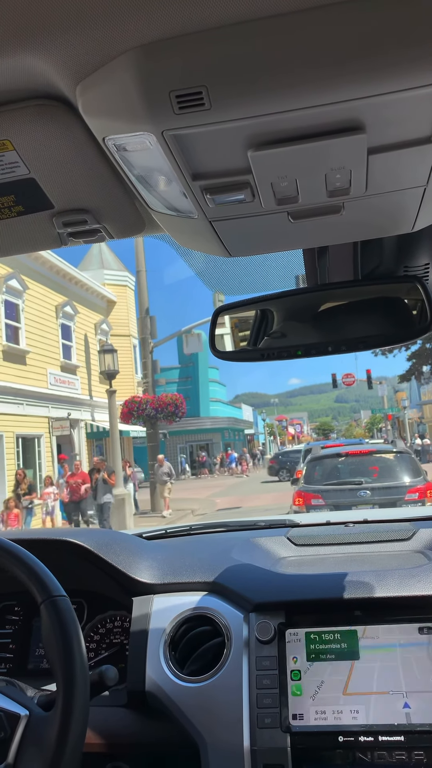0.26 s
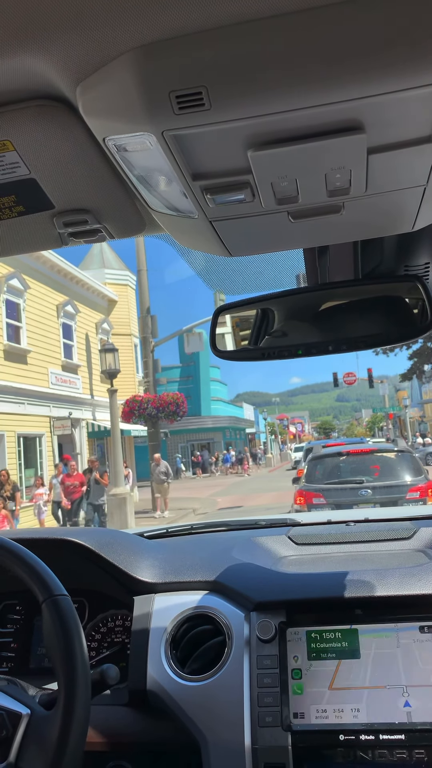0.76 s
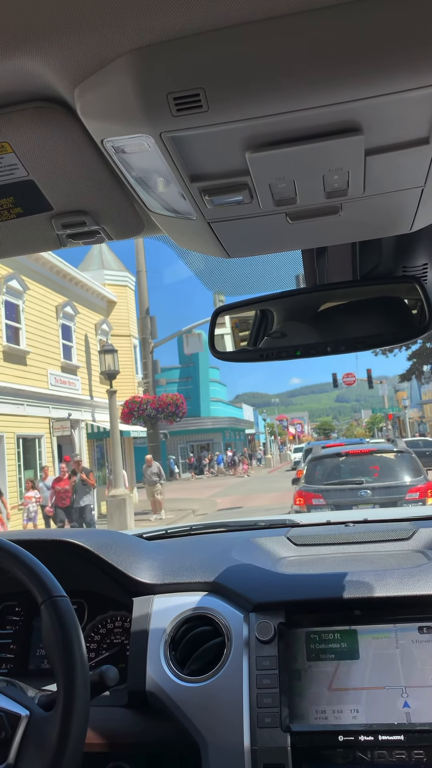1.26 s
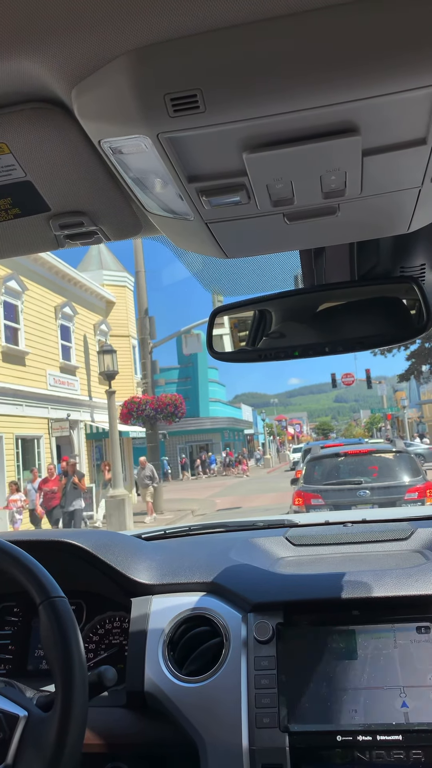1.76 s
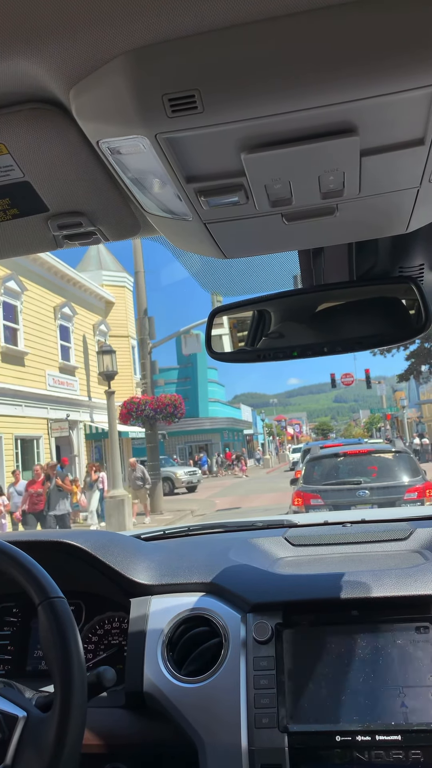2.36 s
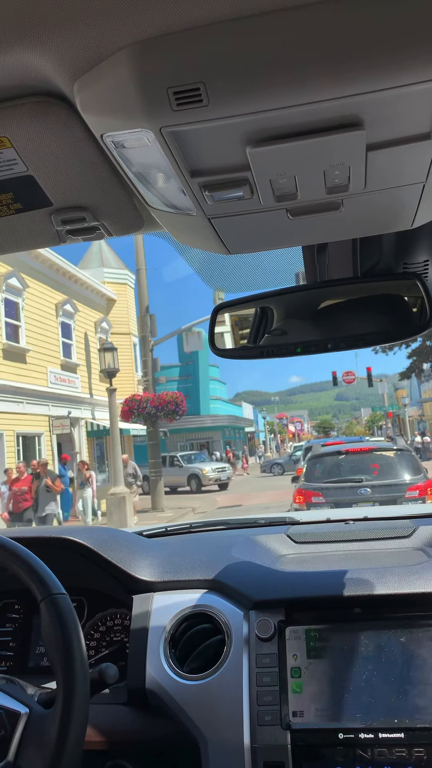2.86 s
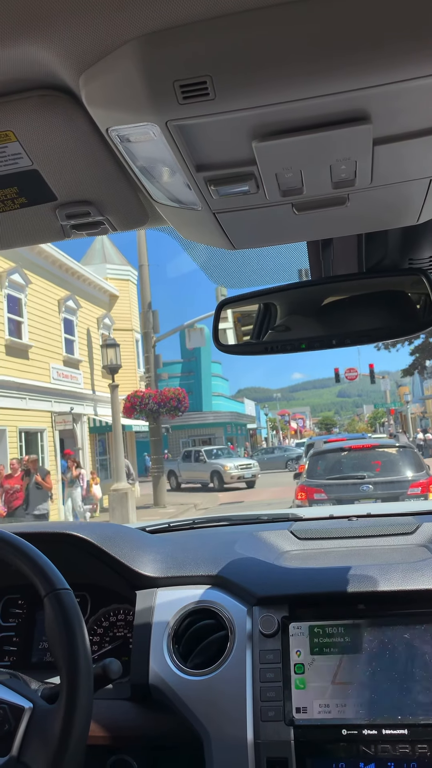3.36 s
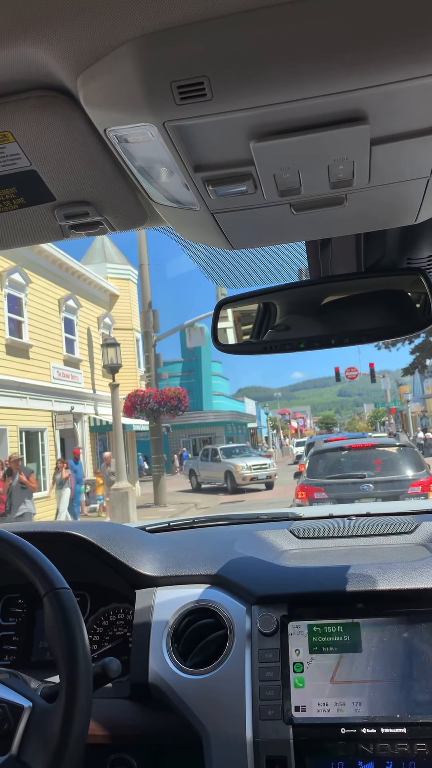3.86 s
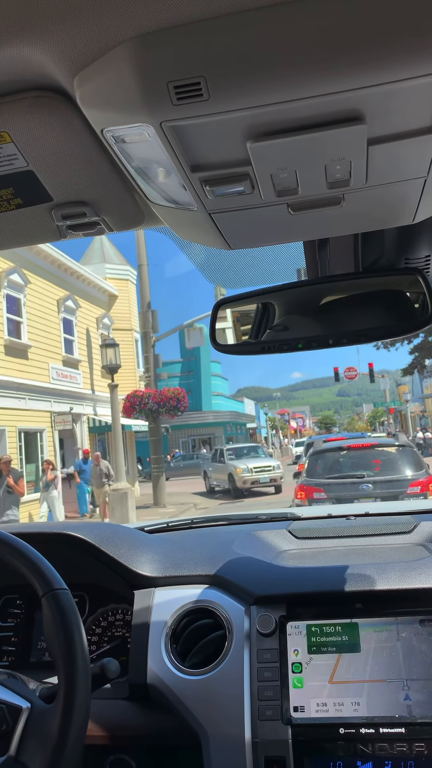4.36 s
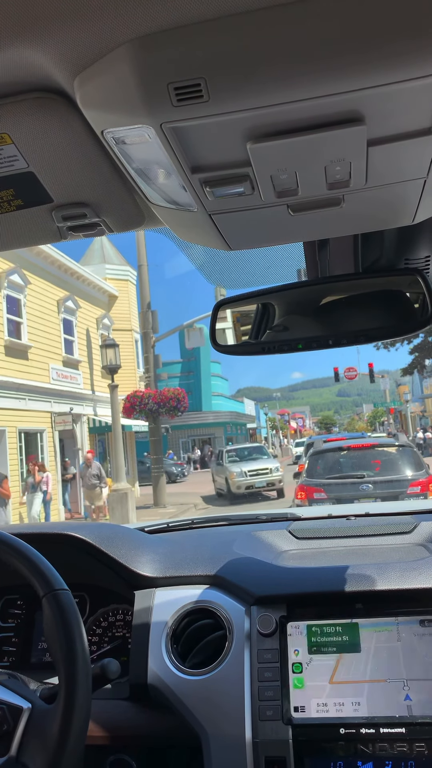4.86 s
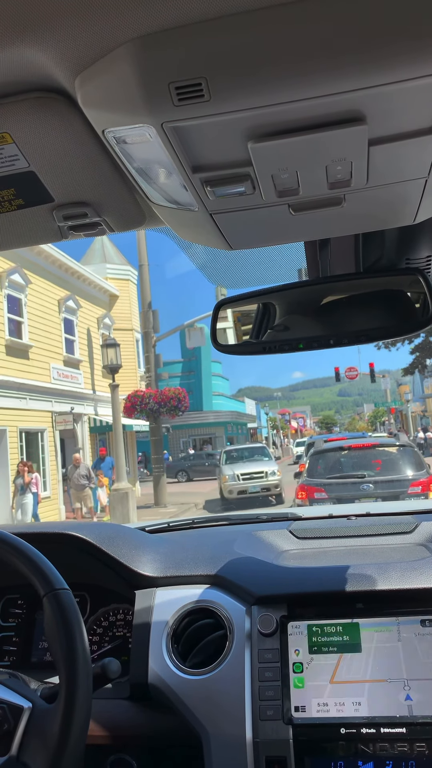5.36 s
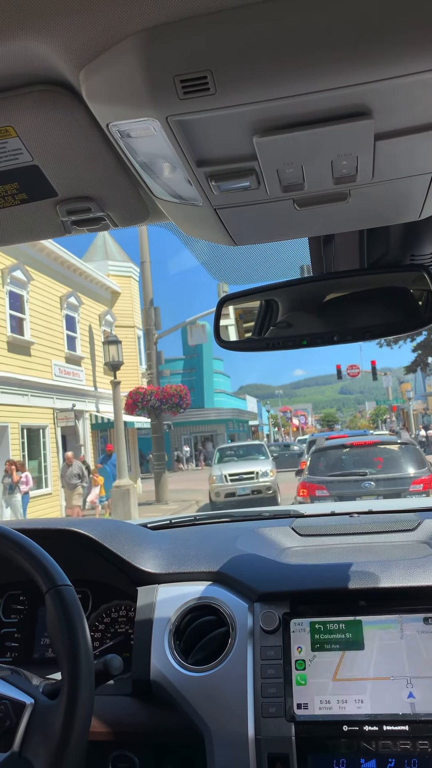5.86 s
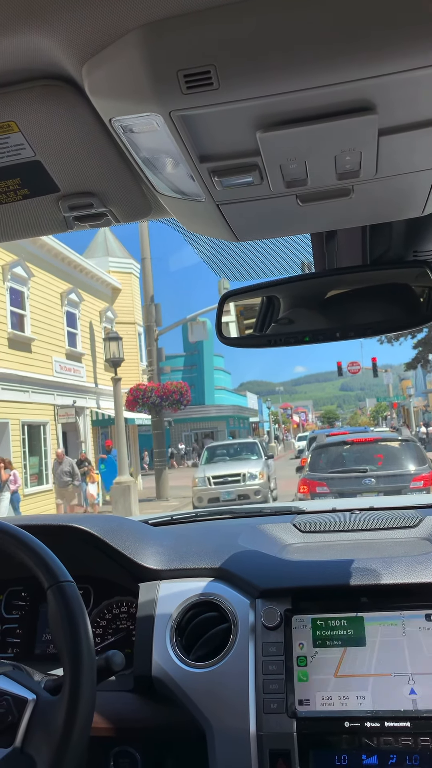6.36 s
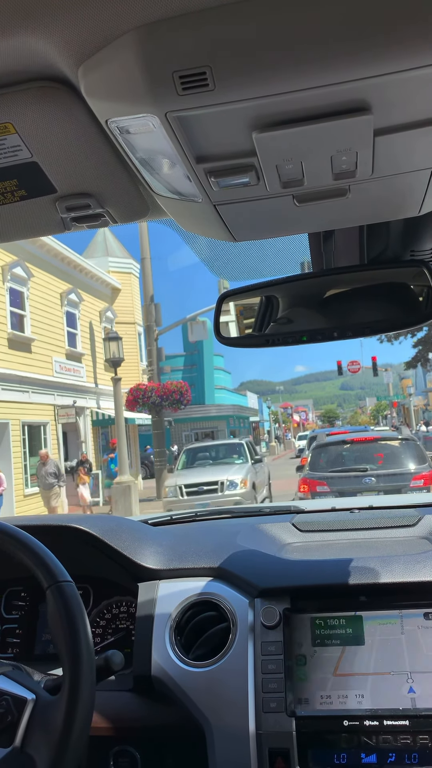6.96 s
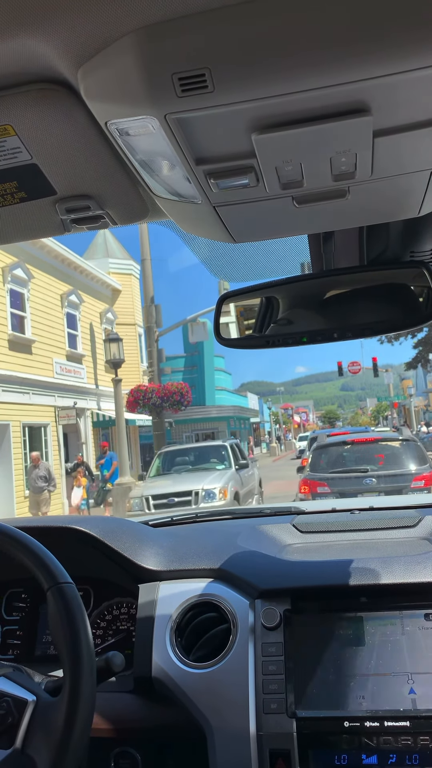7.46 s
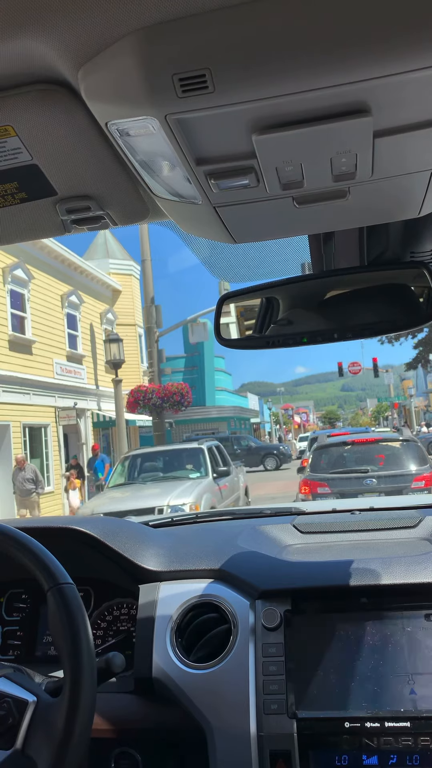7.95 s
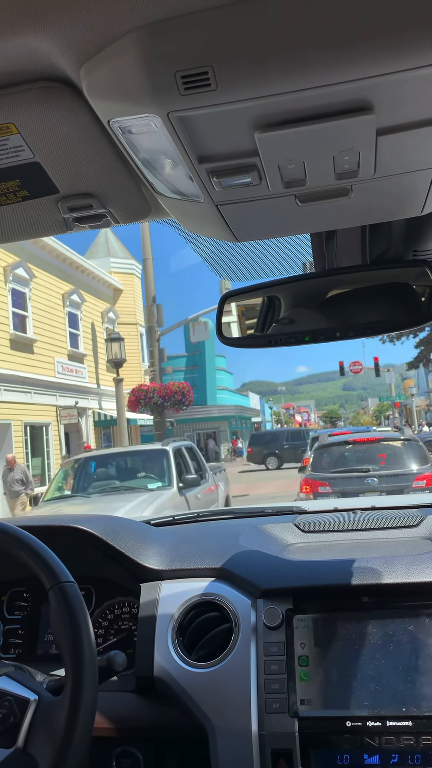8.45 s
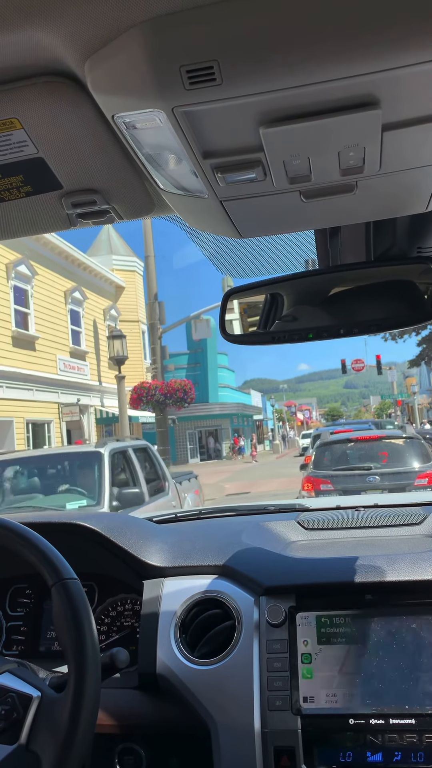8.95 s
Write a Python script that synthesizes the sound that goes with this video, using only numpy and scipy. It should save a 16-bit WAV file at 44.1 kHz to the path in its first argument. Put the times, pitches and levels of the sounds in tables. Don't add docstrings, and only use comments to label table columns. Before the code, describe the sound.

Strong ventilation rush fills a slow-moving car, with regular turn-signal clicking and a deep engine hum that eases down after several seconds.

```python
import sys
import numpy as np
from scipy import signal
from scipy.fft import rfft, irfft, next_fast_len
from scipy.io import wavfile
from scipy.ndimage import uniform_filter1d, map_coordinates

SR = 44100
rng = np.random.default_rng(int(sys.argv[2]) if len(sys.argv) > 2 else 0)


def wav_record(signal):
    frames = np.transpose(np.atleast_2d(signal))
    bounded = np.clip(frames, -1, 1)
    quanta = np.round(bounded * 32767).astype(np.int16)
    wavfile.write(sys.argv[1], SR, quanta)


def gain_from_db(level_db):
    decades = np.asarray(level_db, float) / 20
    return 10 ** decades


N = 406161

# frequency in Hz, density in dB per Hz.
BOOM_SPECTRUM = [(20, -28), (48, -8), (64, -5.5), (82, -4), (99, -4.5), (116, 1), (153, -5), (192, -3),
                 (236, -8), (278, -8), (385, -20), (441, -16.5), (528, -37), (1000, -92)]
# frequency in Hz, lead of the right in radians.
BOOM_LEAD = [(50, .25), (100, 0.32), (200, 0.21), (300, 0.69), (450, 0.89)]
# frequency in Hz, likeness from 0 to 1.
BOOM_ALIKE = [(30, 1), (200, 1), (300, 0.95), (500, 0.94)]
# centre in Hz, width in Hz, level in dB.
CENTRE_DUCTS = [(590, 42, -3.5), (720, 40, -5.5), (824.5, 120, -1), (1044, 99, -7.5), (1140, 78, -0.5),
                (1260, 94, -11), (1524, 180, -10.5), (1581.6, 53, -2), (1930, 93, -13), (2161, 237, -9.5),
                (2420, 78, -12), (2670, 130, -17), (3903, 160, -15.5), (4110, 100, -13.5),
                (6005, 140, -21.5)]
# centre in Hz, width in Hz, level in dB.
SIDE_DUCTS = [(687, 106, 1.5), (880, 87, -2), (1840, 110, -1.5), (2010, 80, -8), (2245, 87, -14),
              (2390, 63, -8), (3150, 150, -9), (3290, 81, -6), (3710, 90, -14), (3980, 120, -15),
              (4320, 99, -11), (4890, 160, -15), (5340, 220, -22)]
# frequency in Hz, density in dB per Hz.
JET_SPECTRUM = [(200, -38), (400, 0), (650, -0.5), (950, -6), (1350, -6), (1750, -11), (2400, -9.5),
                (3500, -14), (5000, -15), (5800, -17.5), (7500, -23), (8800, -27), (9800, -52),
                (12000, -90)]
# frequency in Hz, likeness from 0 to 1.
JET_ALIKE = [(400, 0.45), (1000, 0.27), (2500, 0.3), (3500, 0.067), (5000, 0.52), (7000, 0.53)]
# frequency in Hz, lead of the right in radians.
JET_LEAD = [(400, 0.8), (700, 0), (1350, 0.6), (1900, 1), (2500, 2), (3000, 4), (3600, 6.5), (4200, 7),
            (5000, 9), (6000, 8.5), (7000, 4.5)]
# frequency in Hz, left minus right in dB.
JET_PAN = [(300, 5.5), (650, -5), (950, -3.5), (1350, -0.5), (2500, 1), (5500, -2.5), (10000, -2.5)]
# frequency in Hz, density in dB per Hz.
EDGE_SPECTRUM = [(5400, -40), (7000, -7.5), (8500, 1.5), (10200, 0), (12000, 1.5), (13200, -2.5),
                 (14200, -5), (14800, -5), (15500, -15), (17000, -24)]
# frequency in Hz, level in dB.
EDGE_OWN = [(7000, 0), (8500, -5), (9500, -8), (10200, -15), (12000, -20), (15000, -15)]
# time in seconds, firing rate in Hz, load in dB.
ENGINE_COURSE = [
    (0, 43.9, 0),
    (2.6, 43.8, .7),
    (4.1, 43.3, 1),
    (4.6, 42, -5),
    (5.3, 40.2, -2.5),
    (6, 38, -4.5),
    (6.8, 37.5, -11),
    (9.21, 37.5, -11),
]
# frequency in Hz, level in dB, decay by 60 dB in seconds,
# lead of the right in radians.
TICK_MODES = [(2390, -4, .035, .7), (2570, -1, .035, 1.6), (2660, -3, .03, 1.8), (2740, -1, .035, 2),
              (2830, -2, .03, 2.2), (2950, -5, .03, 1), (3085, -1.5, .04, .7), (3200, -7, .025, 1.4),
              (3320, -8, .02, 1.8)]
# frequency in Hz, level in dB, decay by 60 dB in seconds,
# lead of the right in radians.
TOCK_MODES = [(2300, -5, .025, 1), (2410, -2, .03, .6), (2570, 0, .03, 1.5), (2690, -3, .03, 1.8),
              (2820, -1, .03, 1.9), (2950, -3, .025, .8), (3100, -7, .025, 1.2)]
FIRST_STROKES_S = [
    .1485,
    .4985,
]
# delay after the stroke in seconds, level in dB.
BOUNCES = [
    (0, 0),
    (.006, -2),
    (.012, -4),
]
# start in seconds, level in dB, frequency in Hz, left minus right in dB.
CREAKS = [
    (3.739, -51, 8250, -4.5),
    (4.272, -62, 13500, 0),
    (4.826, -52, 8490, -3.5),
]


def along(points, hz):
    point_hz, values = np.transpose(points)
    return np.interp(np.log(hz + 1), np.log(point_hz + 1), values)


def curves(rows):
    s, *columns = np.transpose(rows)
    return [np.interp(np.arange(N) / SR, s, column) for column in columns]


def unit(x):
    return x / np.sqrt(np.mean(x ** 2) + 1e-20)


def wobble(rate):
    knots = rng.standard_normal(int(N * rate / SR) + 4)
    return map_coordinates(knots, [np.arange(N) * rate / SR])


def filtered(x, response):
    m = next_fast_len(N + 8192)
    return irfft(rfft(x, m) * response(np.fft.rfftfreq(m, 1 / SR)), m)[..., :N]


def blower():
    boom = ports(eddies(patchy_db=0.79), lambda hz: gain_from_db(along(BOOM_SPECTRUM, hz)), BOOM_ALIKE, BOOM_LEAD,
                 pan=[(60, 2.0), (250, 0.0), (450, -2.0)])
    centre = ports(eddies(patchy_db=1.0), pipes(CENTRE_DUCTS),
                   alike=[(600, 0.89), (1500, 1.0), (4000, 0.62)],
                   lead=[(800, -0.89), (1140, -0.0093), (2200, 0.49), (4100, 0.47)],
                   pan=[(800, 0.0), (1600, -3.0), (2200, -1.0), (4100, -1.5)])
    sides = ports(eddies(patchy_db=5.5), pipes(SIDE_DUCTS),
                  alike=[(600, 0.87), (5000, 0.77)],
                  lead=[(700, -2.5), (1200, -4.0), (2200, -4.0), (5000, -3.0)],
                  pan=[(700, -9.0), (2200, 3.5), (5000, -5.5)])
    jets = ports(eddies(patchy_db=1.25), lambda hz: gain_from_db(along(JET_SPECTRUM, hz)),
                 JET_ALIKE, JET_LEAD, JET_PAN)
    ducts = gain_from_db(-51) * centre + gain_from_db(-58.5) * sides
    hiss = gain_from_db(-49.5) * jets + gain_from_db(-64) * louvres()
    flutter_db = 0.11 * wobble(9)
    return gain_from_db(-33) * boom + gain_from_db(flutter_db) * (ducts + hiss)


def eddies(patchy_db):
    z = signal.stft(rng.standard_normal((2, N)), nperseg=512)[2]
    field = rng.standard_normal(z.shape[1:])
    field = uniform_filter1d(field, size=5, axis=0)
    field = uniform_filter1d(field, size=10, axis=1)
    return signal.istft(z * gain_from_db(patchy_db * unit(field)), nperseg=512)[1][:, :N]


def ports(pair, colour, alike, lead, pan):
    def mixing(hz):
        angle = np.arccos(np.clip(along(alike, hz), -1, 1)) / 2
        return colour(hz) * [np.cos(angle), np.sin(angle)]

    def skew(hz):
        left = gain_from_db(along(pan, hz) / 2) * np.exp(-.5j * along(lead, hz))
        return [left, 1 / left]

    shared, own = filtered(pair, mixing)
    return unit(filtered(np.array([shared + own, shared - own]), skew))


def pipes(modes):
    def colour(hz):
        power = 0
        for centre, width, db in modes:
            resonance = hz * width / abs(centre * centre - hz * hz + 1j * hz * width)
            power = power + gain_from_db(db) ** 2 * resonance ** 4
        return np.sqrt(power)

    return colour


def louvres():
    path_s = 1 / 3320

    def skew(hz):
        left = np.exp(-1j * np.pi * (hz - 10170) * path_s)
        return [left, 1 / left]

    shared, own = filtered(eddies(patchy_db=0.3), lambda hz: gain_from_db(along(EDGE_SPECTRUM, hz)))
    own = filtered(own, lambda hz: gain_from_db(along(EDGE_OWN, hz)))
    return unit(filtered(np.array([shared + own, shared - own]), skew))


def engine():
    firing_hz, load_db = curves(ENGINE_COURSE)
    phase = 2 * np.pi * np.cumsum(firing_hz * (1 + 0.0069 * wobble(4.96))) / SR
    lead = np.array([[-.12], [.12]])
    first_db = -42 + load_db + .8 * wobble(3.85)
    second_db = -39.5 + load_db + 0.43 * wobble(3.55)
    first = gain_from_db(first_db) * np.sin(phase + lead)
    second = gain_from_db(second_db) * np.sin(2 * phase + lead + 1.55)
    return first + second


def relay(first_s, modes, level_db):
    blink_s = .70012
    out = np.zeros((2, N + SR))
    start = rng.random(len(modes))
    for s in np.arange(first_s, N / SR, blink_s):
        for late_s, bounce_db in BOUNCES:
            for (hz, mode_db, t60, lead), cycles in zip(modes, start):
                db = level_db + bounce_db + mode_db + rng.normal(0, 1.5)
                add_ring(out, s + late_s, hz, db, t60, .002, lead, cycles + hz * late_s)
    return out[:, :N]


def add_ring(out, s, hz, db, t60, rise_s, lead, cycles):
    t = np.arange(SR // 10) / SR
    envelope = gain_from_db(db - 60 * t / t60) * (1 - np.exp(-t / rise_s)) ** 2
    phase = 2 * np.pi * (hz * t + cycles) + lead / 2 * np.array([[-1], [1]])
    first = round(s * SR)
    out[:, first:first + len(t)] += envelope * np.sin(phase)


def trim():
    out = np.zeros((2, N + SR))
    for s, db, hz, pan_db in CREAKS:
        side_db = pan_db / 2 * np.array([[1], [-1]])
        add_ring(out, s, hz, db + 3.0 + side_db, t60=.03, rise_s=.001, lead=1.2, cycles=0)
    return out[:, :N]


def scene():
    tick = relay(FIRST_STROKES_S[0], TICK_MODES, level_db=0)
    tock = relay(FIRST_STROKES_S[1], TOCK_MODES, level_db=-.6)
    return blower() + engine() + gain_from_db(-46.0) * (tick + tock) + trim()


def low_pass(x):
    return signal.sosfilt(signal.butter(12, 15750, fs=SR, output="sos"), x)


def record(dry):
    return low_pass(dry)


dry = scene()
out = record(dry)
wav_record(out)
```